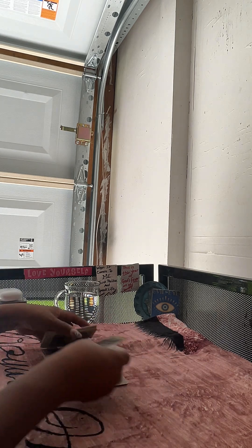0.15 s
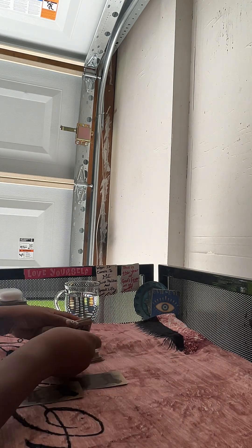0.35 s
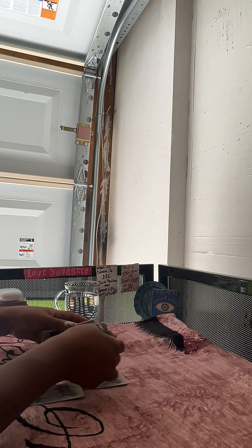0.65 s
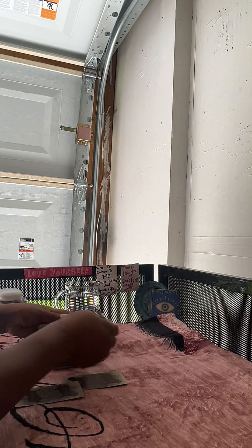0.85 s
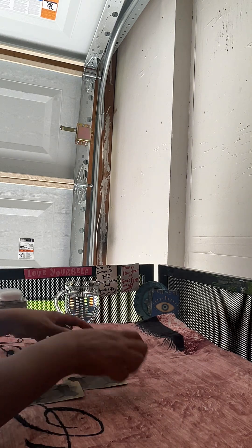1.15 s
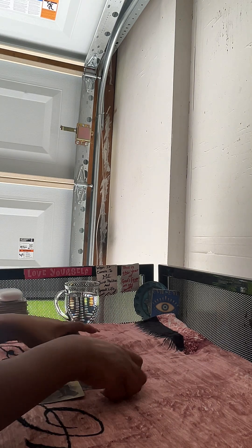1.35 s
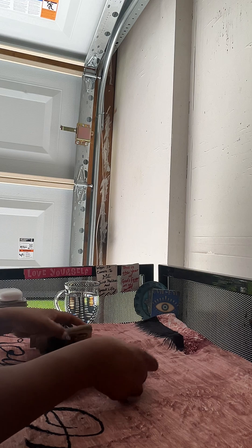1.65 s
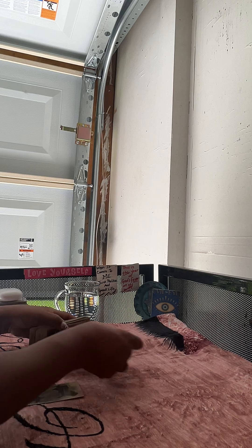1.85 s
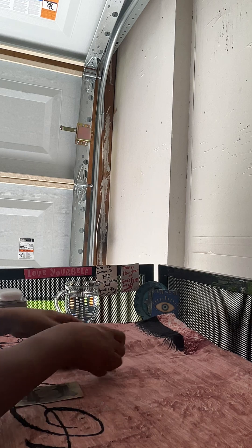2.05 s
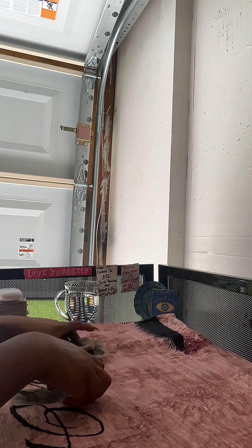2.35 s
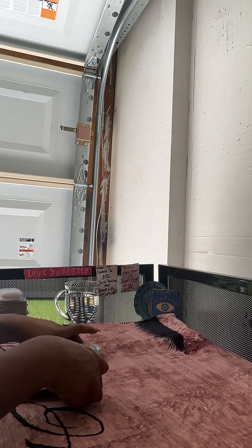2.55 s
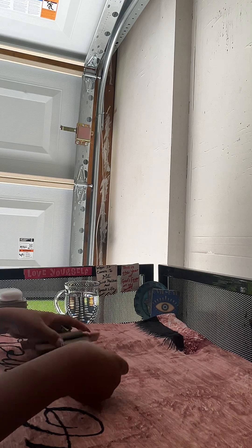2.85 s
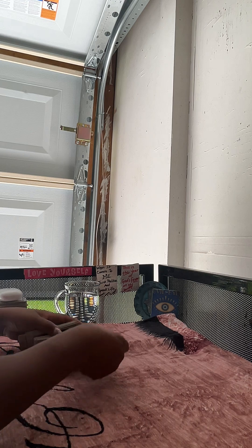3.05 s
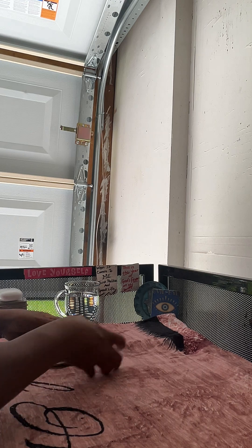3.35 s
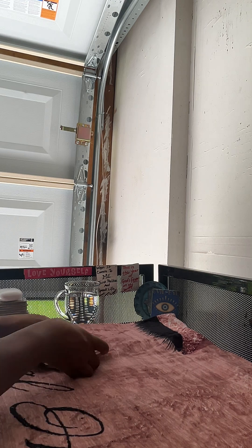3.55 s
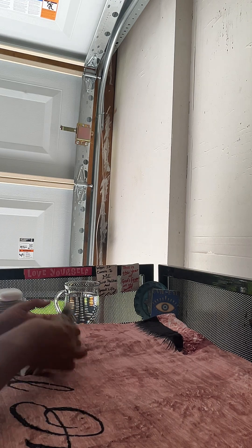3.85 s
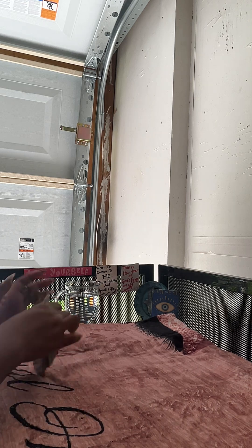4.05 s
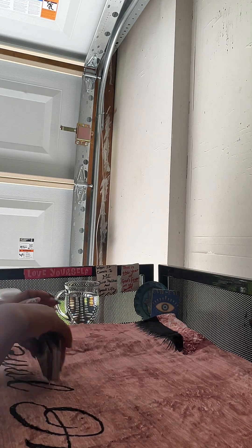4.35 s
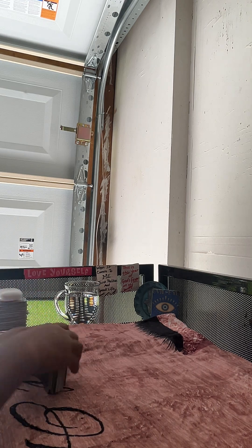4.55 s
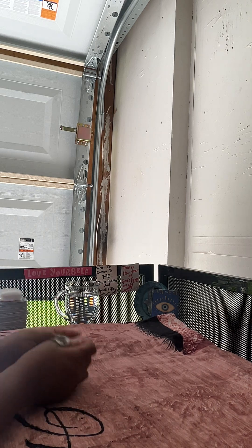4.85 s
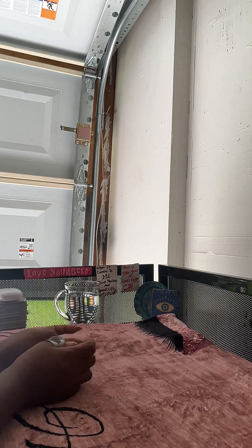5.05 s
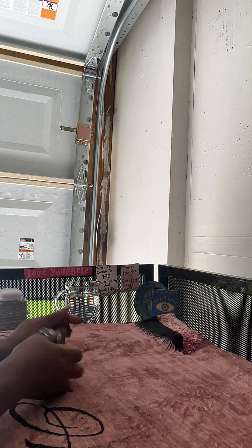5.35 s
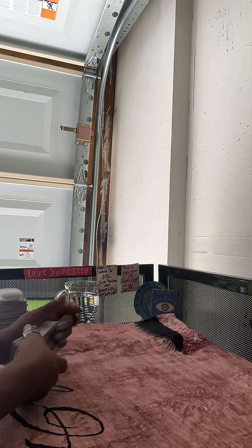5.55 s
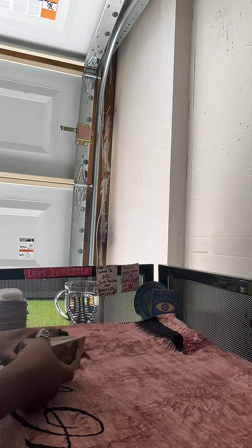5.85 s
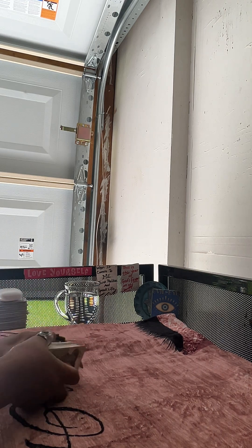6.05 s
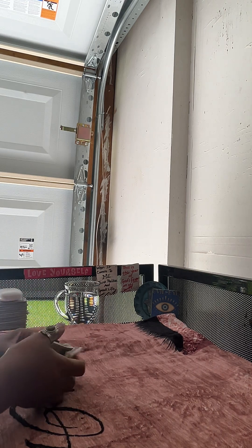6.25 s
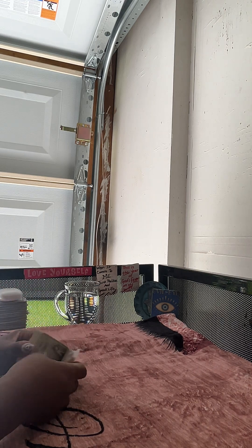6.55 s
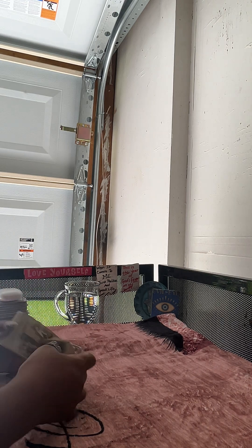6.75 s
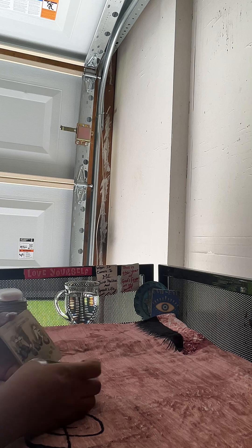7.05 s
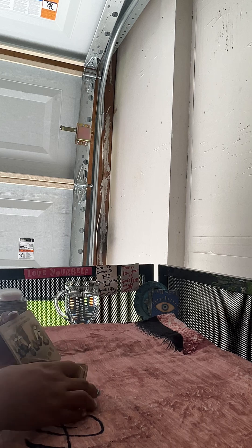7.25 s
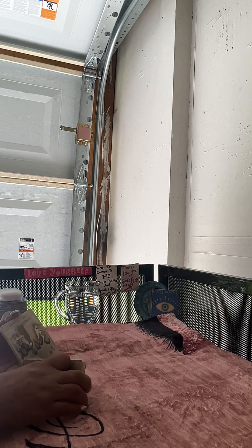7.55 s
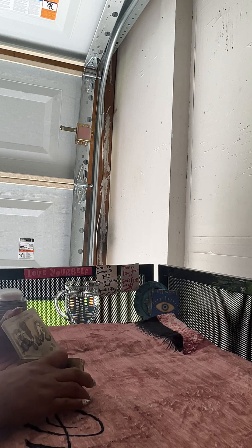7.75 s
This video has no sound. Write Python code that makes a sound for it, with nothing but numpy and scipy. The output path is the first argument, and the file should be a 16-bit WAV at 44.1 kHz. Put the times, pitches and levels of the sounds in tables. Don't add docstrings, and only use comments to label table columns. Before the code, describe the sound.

A worn deck is handled on a padded tabletop. Sparse snaps and swishing slides come first over a faint receding tyre hiss, then a busier flurry of slaps and scrapes, and dull wooden bumps as the pile is squared. A lull leads to a short, much louder purring riffle, followed by small rubs and a last soft slap. Near, dry sound in a small garage.

```python
import sys
import numpy as np
from scipy import signal
from scipy.fft import rfft, irfft, next_fast_len
from scipy.io import wavfile

SR = 44100
rng = np.random.default_rng(int(sys.argv[2]) if len(sys.argv) > 2 else 0)


def put_to_file(sound):
    columns = np.atleast_2d(sound).T
    safe = np.clip(columns, -1, 1)
    whole_steps = np.round(safe * 32767)
    wavfile.write(sys.argv[1], SR, whole_steps.astype(np.int16))


def ratio(d):
    e = np.asarray(d, float) / 20
    return 10 ** e


N = 348886
SIZE = next_fast_len(N + SR)
HZ = np.maximum(np.fft.rfftfreq(SIZE, 1 / SR), 1)

# start in seconds, peak in dB, pitch in
# Hz.
CARD_SLAPS = [(0.008, -51, 1210), (0.371, -59, 437), (0.721, -56, 400), (0.735, -61, 300),
              (0.977, -45, 1180), (0.991, -44, 690), (1.155, -58, 600), (1.184, -50.5, 580),
              (0.998, -43.5, 1170), (1.008, -42, 1110), (1.2805, -35, 1760), (1.283, -46, 322),
              (1.29, -57, 282), (1.582, -47, 1200), (1.597, -43.5, 1250), (2.027, -71, 437),
              (2.119, -48.5, 700), (2.146, -41.5, 490), (2.507, -44, 345), (2.507, -40, 2880),
              (2.513, -39.5, 593), (2.518, -52, 433), (2.635, -56.5, 440), (2.88, -58.5, 1610),
              (3.09, -61.5, 1500), (3.239, -43, 1600), (3.284, -49.5, 420), (3.374, -45, 1160),
              (3.418, -32.5, 890), (3.439, -33.5, 444), (3.4445, -36, 555), (3.454, -43, 445),
              (3.478, -37, 1540), (3.489, -32, 1850), (3.664, -42, 1330), (3.824, -34.5, 1380),
              (3.8245, -36.5, 965), (3.907, -34.5, 1990), (3.95, -48.5, 565), (4.101, -72, 530),
              (4.14, -48.5, 426), (4.152, -52.5, 294), (4.454, -57.5, 764), (4.492, -56, 696),
              (4.532, -55, 420), (4.629, -68, 657), (4.784, -51, 790), (4.88, -45.5, 1220),
              (4.99, -52.5, 1160), (5.097, -56.5, 485), (5.231, -56.5, 1060), (5.271, -66, 1250),
              (5.29, -46, 1120), (5.305, -47.5, 1040), (5.32, -48.5, 910), (5.378, -55.5, 527),
              (5.449, -64, 750), (5.482, -52, 1090), (5.583, -60, 635), (5.742, -65, 1190),
              (5.765, -54.5, 352),
              (6.789, -62, 480), (6.861, -54, 664), (6.922, -67, 607), (6.948, -54, 1300),
                 (6.995, -57, 597), (7.2465, -40.5, 1544)]
# start in seconds, peak in dB, pitch in Hz.
PACKET_SLAPS = [(6.1875, -27.5, 2700.0), (6.226, -33.5, 520.0), (6.2625, -29, 400.0), (6.2348, -32, 830.0),
                (6.2498, -22, 730.0), (6.2584, -23.5, 690.0), (6.2857, -8.5, 1000.0), (6.3037, -8, 980.0),
                (6.3105, -25.5, 1160.0), (6.3255, -9.5, 1100.0), (6.335, -31, 1070.0), (6.3463, -18, 800.0),
                (6.354, -31.5, 970.0), (6.3601, -20, 800.0), (6.3688, -19.5, 820.0), (6.3818, -19.5, 750.0),
                (6.4004, -19.5, 750.0), (6.4051, -17, 750.0), (6.4246, -19.5, 820.0), (6.4395, -18, 800.0),
                (6.4527, -19, 800.0)]


def slaps(rows, gain_db, puff_share, puff_t60_s, ring_cycles, pile_share, crack_share, flap_share,
          cloth_share, settled, sharp_s):
    crack_s, flap_ratio, flap_t60_s = .0001, 2.4, 0.012
    cloth_hz, cloth_sag_per_s, cloth_rise_s, cloth_t60_s = 487, 9.0, 0.0044, 0.031
    puff_likeness = 0.27
    out, t = np.zeros((2, N)), np.arange(4000) / SR
    puffs = band(rng.standard_normal((len(rows), 2, len(t))), 310, 2700)
    change = (puff_likeness - 1) * puffs[:, 0] + np.sqrt(1 - puff_likeness ** 2) * puffs[:, 1]
    puffs[:, 1] = puffs[:, 0] + band(change, 500, 2300, order=3)
    rise = (1 - np.exp(-t / 0.00053)) ** 2
    cloth = np.sin(2 * np.pi * cloth_hz * t * (1 - cloth_sag_per_s * t))
    cloth = cloth * (1 - np.exp(-t / cloth_rise_s)) * ratio(-60 * t / cloth_t60_s)
    for (s, peak_db, hz), puff in zip(rows, puffs):
        cycles = hz * (settled * t + sharp_s * (1 - np.exp(-t / .001)))
        pocket = np.sin(2 * np.pi * cycles) * ratio(-60 * t * hz / ring_cycles)
        pile = np.sin(np.pi * cycles) * ratio(-60 * t * hz / 10.0)
        flap = np.sin(2 * np.pi * flap_ratio * cycles) * ratio(-60 * t / flap_t60_s)
        crack = np.exp(-((cycles - .75) / (hz * crack_s)) ** 2)
        pop = pocket + pile_share * pile + flap_share * flap + cloth_share * cloth - crack_share * crack
        add(out, s, ratio(peak_db + gain_db) * rise * (pop + puff_share * puff * ratio(-60 * t / puff_t60_s)))
    return out


# start in seconds, peak in dB, dullness in dB.
EDGE_TICKS = [(0.006, -50, -23), (0.3696, -43, -2), (0.404, -42, -3), (0.524, -62, 4), (0.583, -60.5, 14),
              (0.9747, -48, -17), (0.9904, -34, -32), (0.997, -47, 9.5), (1.007, -54, -7),
              (1.1575, -50.5, -9), (1.2012, -38.5, -5), (1.281, -37.5, 3), (1.5066, -37.5, -12),
              (1.5983, -49, 18), (2.1199, -45, -2), (2.1429, -40.5, -8), (2.241, -57, 4),
              (2.2627, -43.5, -11), (2.45, -50, -7), (2.507, -45, 7.5), (2.695, -45, -17),
              (3.226, -57, -1), (3.241, -47.5, -8), (3.284, -44.5, -32), (3.3925, -43.5, 4),
                  (3.398, -56, 10), (3.4804, -51, -1), (3.6566, -43, 1), (3.8248, -37, 1),
                  (3.904, -43, -17), (4.1793, -46, -9), (4.4525, -60, -3), (4.4901, -55, -14),
                  (4.531, -55, -11), (4.6373, -67, -8), (4.7595, -61, 2), (5.198, -66, -10),
                  (5.5452, -69, -7), (3.3756, -59, -5), (4.7837, -54, -1), (4.8798, -61, 19),
                  (4.9207, -41, -18), (4.9928, -54.5, 4), (5.16, -55.5, -15), (5.377, -38, -23),
                  (5.452, -41, -13), (5.5825, -50, -18), (5.74, -53, -17), (6.117, -66, -14),
                  (6.126, -52, -2), (6.177, -62, -9),
              (6.576, -45, -14), (6.791, -49, 1), (6.811, -57, 12), (6.8623, -45, 2.5),
                 (6.993, -58, 9.5), (6.706, -48, -15), (7.2468, -53.5, 2.5)]
# start in seconds, peak in dB, dullness in dB.
CORNER_TICKS = [(6.1888, -25.5, 3.5), (6.2058, -41.5, 3.5), (6.2103, -40, -2), (6.2204, -32.5, -5),
                (6.2367, -39.5, -2.5), (6.2438, -36, -5), (6.2503, -25, -5), (6.2589, -23, -4),
                (6.2744, -36, -5), (6.286, -28, 4), (6.2927, -33.5, -2.5), (6.3045, -27.5, 2.5),
                (6.3122, -35.5, 2.5), (6.3155, -31.5, -6.5), (6.3263, -25, -1.5), (6.3346, -32.5, -4),
                (6.3483, -32, 0), (6.3573, -37, 2), (6.3604, -38.5, -1), (6.3702, -28.5, -6),
                (6.3818, -43, 11), (6.3893, -28.5, -1), (6.3942, -29, -7), (6.4004, -37, 7),
                (6.4051, -37, 12), (6.4139, -36.5, -4), (6.4245, -36.5, 3.5), (6.4287, -26, -6),
                (6.4417, -24.5, -10), (6.4528, -37, 4.5)]


def ticks(rows, dull_gain_db, corner_share):
    gain_db, edge_dullness = 6.0, 0.35
    out, t = np.zeros(N), np.arange(2000) / SR
    rattle_and_fizz = ratio(-60 * t / .004) + .2 * ratio(-60 * t / .025)
    force = rng.standard_normal((len(rows), len(t))) * rattle_and_fizz
    force[:, 0] = -3
    brights = signal.lfilter([.6], [1, -edge_dullness], band(force, 4000, 17000))
    brights = brights + corner_share * band(force, 4400, 7600)
    for (s, peak_db, dull_db), dull, bright in zip(rows, band(force, 2500, 4800), brights):
        add(out, s, ratio(peak_db + gain_db) * (ratio(dull_db + dull_gain_db) * dull + bright))
    return out


# frequency in Hz, density in dB per Hz.
BRUSH_COLOUR = [(70, -17.5), (140, 6), (250, 9.5), (450, 10), (700, -7), (1000, -4.5), (1600, -47)]
# frequency in Hz, density in dB per Hz.
EDGE_COLOUR = [(3500, -25), (5000, -2), (7000, 0), (9000, -3), (12000, -5), (14000, -9), (16000, -12)]
# frequency in Hz, density in dB per Hz.
DULL_EDGE_COLOUR = [(1800, -54.5), (2800, -10.5), (4000, 3.5), (5500, -7), (7500, -32)]
# time in seconds, level in dB.
PALM_LEVEL = [(0.0, -69), (0.99, -70), (1.45, -60), (1.74, -67.5), (1.96, -77), (2.49, -67.5),
              (2.82, -76.5), (3.26, -70.5), (3.52, -51), (4.16, -69.5), (4.29, -71.5), (5.44, -68),
              (5.79, -79.5), (6.06, -74.5), (6.34, -47), (6.54, -66.5), (7.51, -86.5), (7.91, -83.5)]
# frequency in Hz, density in dB per Hz.
PALM_SPECTRUM = [(150, -5), (350, -10), (800, -8.5), (1400, -5.5), (2500, -6.5), (4000, -11), (6000, -39.5)]
# time in seconds, level in dB.
FLUTTER_LEVEL = [(6.18, -120), (6.186, -75), (6.192, -44.5), (6.23, -47), (6.255, -37.5), (6.28, -47),
                 (6.31, -50), (6.455, -42.5), (6.48, -52.5), (6.58, -74.5), (6.7, -110)]
# frequency in Hz, density in dB per Hz.
FLUTTER_SPECTRUM = [(150, -20.5), (280, 5), (450, 5), (1100, 0.5), (2000, -4), (4000, -7.5), (6000, -30.5)]


def slides():
    catches_per_s, catch_db = 120, 16
    brush_db, scrape_db, edge_db = strokes()
    dull_db = edge_db + 0.26 * (scrape_db - edge_db) - 1
    slips = rng.standard_normal((2, N)) * ratio(2.9 * np.minimum(rng.exponential(1, (2, N)), 5))
    catches = rng.random(N) < catches_per_s / SR
    slips = slips + catches * ratio(catch_db + 4.0 * np.minimum(rng.exponential(1, N), 2))
    pressure = ratio(1.5 * (drift(15) + drift(60)))
    brush = ratio(brush_db - 9.5 + 1.1 * drift(41)) * colour(slips, BRUSH_COLOUR)
    scrape = ratio(scrape_db - 6.5) * card_modes(slips)
    edges = ratio(edge_db - 6.0) * tilted(colour(slips, EDGE_COLOUR))
    dull_edges = ratio(dull_db - 6.5) * colour(slips, DULL_EDGE_COLOUR)
    palms = ratio(level_in_time(PALM_LEVEL) - 4.5 + 2.0 * drift(18.0)) * colour(slips, PALM_SPECTRUM)
    flutter = ratio(level_in_time(FLUTTER_LEVEL)) * colour(slips, FLUTTER_SPECTRUM)
    return pressure * (palms + brush + scrape + edges + dull_edges + flutter)


# start in seconds, fade in seconds, cloth brush, card scrape, edge hiss in dB.
FLICK_STROKES = [(0.0, 0.061, -62, -58, -59), (0.368, 0.27, -53, -54.5, -56.5),
                 (0.582, 0.09, -61, -59, -57.5), (0.722, 0.041, -46.5, -94, -99),
                 (0.99, 0.18, -49, -53, -46.5), (1.2, 0.13, -50.5, -79, -57),
                 (1.597, 0.17, -55.5, -61, -58), (2.023, 0.088, -48.5, -58.5, -69.5),
                 (2.137, 0.26, -46, -84, -64), (2.506, 0.25, -46, -52, -64),
                 (3.238, 0.21, -52.5, -59, -60.5), (3.39, 0.18, -58, -76, -57.5),
                 (3.41, 0.17, -43, -65, -70), (3.478, 0.36, -39, -47, -46),
                 (3.821, 0.29, -47.5, -48, -55.5), (4.458, 1, -58, -62, -85),
                 (5.582, 0.081, -63, -60, -53.5), (6.79, 0.13, -53, -59, -56),
                 (7.246, 0.44, -71, -64.5, -77.5)]
# start in seconds, length in seconds, cloth brush, card scrape, edge hiss in dB.
PUSH_STROKES = [(0.045, 0.13, -69.5, -68, -108), (1.274, 0.12, -52, -69.5, -64),
                (1.397, .14, -55.5, -69, -68.5), (2.235, 0.12, -57, -69, -66),
                (4.444, 0.12, -90, -90, -71.5), (2.389, 0.099, -56.5, -66, -69.5),
                (2.604, 0.098, -61, -90, -73.5), (3.657, 0.047, -80, -75, -66), (5.62, .1, -92, -77, -87),
                (3.894, 0.066, -50, -52.5, -61), (4.089, .21, -52.5, -60, -62),
                (4.62, 0.068, -79, -64, -66.5), (4.74, 0.29, -105, -66, -65.5),
                (5.08, 0.37, -65, -71.5, -77), (5.147, .05, -87, -84, -75),
                (5.256, 0.073, -65, -58.5, -63.5), (5.356, 0.17, -67, -61, -67.5),
                (5.54, .05, -74, -65, -65), (5.724, 0.073, -55.5, -61, -70.5),
                (5.995, 0.16, -70, -63.5, -65), (6.18, 0.3, -62, -74.5, -50), (6.464, 0.2, -66, -61, -66.5),
                (6.65, 0.076, -75, -70, -50), (6.779, 0.23, -62.5, -61.5, -67),
                (7.045, 0.18, -75.5, -72.5, -84), (7.17, 0.061, -86, -68, -74.5),
                (7.301, 0.8, -74.5, -95, -88)]


def strokes():
    flick_attack_s, flick_fade_db, edge_fades_faster = 0.0032, 28.5, 1.63
    push_attack_s, push_release_db_per_s, faces_release_stretch, push_swell_db = 0.012, 445, 0.69, 2
    resting_db = np.c_[[-75.5, -88.5, -99]]
    t = np.arange(SR) / SR
    power = ratio(2 * (resting_db + np.pad(background_change_db(), (0, SR))))
    for s, fade_s, *levels_db in FLICK_STROKES:
        fall_db = flick_fade_db * t / fade_s * np.c_[[1, 1, edge_fades_faster]]
        at = round(s * SR)
        power[:, at:at + SR] += (np.minimum(t / flick_attack_s, 1) * ratio(np.c_[levels_db] - fall_db)) ** 2
    for s, length_s, *levels_db in PUSH_STROKES:
        release_s = np.maximum(t - length_s, 0) / np.c_[[faces_release_stretch, faces_release_stretch, 1]]
        fall_db = push_release_db_per_s * release_s + push_swell_db * np.minimum(2 * t / length_s - 1, 1) ** 2
        at = round(s * SR)
        power[:, at:at + SR] += (np.minimum(t / push_attack_s, 1) * ratio(np.c_[levels_db] - fall_db)) ** 2
    return 10 * np.log10(power[:, :N])


# frequency in Hz, width in Hz, level in dB.
CARD_MODES = [(720, 400, -1), (950, 400, -1), (1200, 450, 0), (1500, 500, -2), (1850, 550, -4),
              (2250, 600, -4), (2750, 700, -5)]


def card_modes(slips):
    modes = (ratio(db + 2.5 * drift(10)) * resonance(slips, hz, width_hz) for hz, width_hz, db in CARD_MODES)
    return rms_one(sum(modes))


def tilted(hiss):
    split_hz, tilt_db = 6600, 2.5
    low = signal.sosfilt(signal.butter(2, split_hz, fs=SR, output="sos"), hiss)
    high = signal.sosfilt(signal.butter(2, split_hz, "high", fs=SR, output="sos"), hiss)
    return ratio(tilt_db * drift(11)) * low - ratio(tilt_db * drift(9)) * high


# start in seconds, length in seconds, level in dB, low and high edge in Hz.
BAND_NOISES = [(0.3, 0.5, -86, 4900, 5200), (2.505, 0.07, -57, 1850, 2700), (2.535, 0.15, -67, 5850, 7900),
               (2.3, .04, -60, 4800, 15800), (6.19, .26, -56, 12500, 16400),
               (3.391, .016, -54, 4000, 5600), (3.482, .07, -60, 6100, 7500), (4.098, .06, -56, 340, 480),
               (0, 2.0, -82, 4300, 5300), (2.435, .07, -65, 900, 2600), (3.49, 0.07, -53, 1900, 2250),
               (3.54, 0.14, -54, 2050, 2500), (3.49, .14, -54, 950, 1250), (4.485, 0.04, -63, 4600, 6800),
               (4.53, .03, -64, 4600, 6800), (2.66, .12, -70, 1150, 1600), (6.01, .1, -66, 1050, 1400),
               (6.695, .04, -60, 4600, 8500), (7.16, .08, -74, 1500, 2300), (5.728, 0.12, -73, 5600, 6800),
               (5.74, 0.21, -71, 6700, 7800), (5.8, .16, -84, 3900, 5600), (7.35, 0.39, -88, 4000, 4600)]


def draws():
    out, t = np.zeros(N), np.arange(100000) / SR
    grip = drift(28)
    for s, length_s, level_db, low_hz, high_hz in BAND_NOISES:
        start = np.clip(t / min(.015, length_s / 6), 0, 1)
        end = np.clip((length_s - t) / min(.12, length_s) + .5, 0, 1)
        wavering = ratio(2 * np.roll(grip, round(-s * SR))[:len(t)])
        rub = rms_one(band(rng.standard_normal(len(t)), low_hz, high_hz, order=4))
        add(out, s, ratio(level_db) * start * wavering * end * rub)
    return out


# crest in seconds, peak in dB, pitch in Hz.
TABLE_THUMPS = [(0.76, -52, 64.6), (2.179, -46.5, 61.5), (2.522, -59, 70), (3.509, -44, 60),
                (3.59, -54, 64.4), (4.125, -39.5, 74), (4.163, -30.5, 73), (4.15, -32, 168),
                (4.186, -43, 75), (4.21, -46, 76.5), (4.245, -47, 62), (4.48, -40.5, 78), (4.508, -41, 87),
                (4.551, -38.5, 67), (4.818, -49, 69), (4.875, -42, 61), (4.921, -50, 69),
                (5.043, -40, 56.5), (5.188, -53, 60), (6.326, -40, 71.6), (6.65, -52.5, 60),
                (6.89, -48.5, 59.7), (7.122, -55.5, 57)]


def thumps():
    leg_lag_s, deck_moves_left_s = .0009, 4.3
    lean_before_db, lean_after_db = -0.5, 2.5
    out, t = np.zeros((2, N)), np.arange(-2500, 2500) / SR
    for s, peak_db, hz in TABLE_THUMPS:
        lag_s = leg_lag_s if s < deck_moves_left_s else -leg_lag_s
        lean_db = lean_after_db if s > deck_moves_left_s else lean_before_db
        for side, late, db in zip(out, (t - lag_s, t + lag_s), (lean_db, -lean_db)):
            swell = np.exp(-(late * hz / 0.98) ** 2)
            add(side, s + t[0], ratio(peak_db + db) * swell * np.cos(2 * np.pi * hz * late))
    return out


# time in seconds, level in dB.
TREMBLE_LEVEL = [(0.0, -61), (0.26, -68.5), (1.5, -64), (1.91, -67), (2.34, -61.5), (3.0, -67), (3.28, -68),
                 (3.52, -54), (3.85, -65.5), (4.65, -62), (6.04, -71), (6.37, -60.5), (6.61, -70),
                 (7.36, -74), (7.51, -69.5), (7.91, -69)]
# frequency in Hz, density in dB per Hz.
RUMBLE_COLOUR = [(20, -28), (40, -1.5), (60, 8), (85, 1), (130, -7.5), (250, -45.5)]


def table():
    level_db = level_in_time(TREMBLE_LEVEL) + 3.5 + 2.0 * drift(4.9)
    return ratio(level_db) * colour(rng.standard_normal((2, N)), RUMBLE_COLOUR)


def garage(x):
    t60_s, wall_cut_hz = .3, 3500
    out, t60_s = np.zeros((2, len(HZ)), complex), t60_s / (1 + HZ / wall_cut_hz)
    for k, lag_s in enumerate(rng.uniform(0.008, 0.05, 14)):
        loop = np.exp(-lag_s * (np.log(1000) / t60_s + 2j * np.pi * HZ))
        out[k % 2] += loop / (1 - loop) * (-1) ** (k // 2)
    return irfft(out * rfft(x, SIZE), SIZE)[:, :N]


# frequency in Hz, density in dB per Hz.
AIR_COLOUR = [(100, 1.5), (340, -19), (1200, -11.5), (3000, -5.5), (3800, 0), (4700, -26), (6500, -30.5),
              (16000, -33)]


def outside():
    low_hz, high_hz, sag_hz, sinks_s = 8600, 9600, 400, 2.6
    t = np.arange(N) / SR
    roar_db, hiss_db, air_db = -71.5 - 3 * t, -76.5 - 2.5 * t, -77.5
    white = rng.standard_normal((3, 2, N))
    roar = resonance(white[0], 1400, width_hz=750) + .5 * rms_one(band(white[0], 2400, 5200))
    sunk = np.clip(t / sinks_s, 0, 1)
    near_hiss = band(white[1], low_hz, high_hz, order=3)
    far_hiss = band(white[1], low_hz - sag_hz, high_hz - sag_hz, order=3)
    hiss = rms_one((1 - sunk) * near_hiss + sunk * far_hiss)
    air = ratio(air_db) * colour(white[2], AIR_COLOUR)
    return ratio(roar_db + 0.56 * drift(4.6)) * roar + ratio(hiss_db + 0.7 * drift(3)) * hiss + air


# start in seconds, length in seconds, level in dB.
BACKGROUND_DIPS = [
    (2.74, .47, -6),
    (5.8, .2, -9),
]


def background_change_db():
    edge_s, t = .06, np.arange(N) / SR
    return sum(db * np.clip(np.minimum(t - s, s + length_s - t) / edge_s + .5, 0, 1)
               for s, length_s, db in BACKGROUND_DIPS)


# frequency in Hz, lead of the left port in radians.
LEFT_LEAD = [(0, 0), (400, 0), (780, 1.4), (1030, 4.2), (1400, 6.7), (2100, 12), (2300, 10.5), (3080, 9.7),
             (3580, 9.15), (4200, 8.6), (7700, 6.4), (9900, 6.0), (12300, 4.4), (13400, 3.4), (17000, 2.4)]
# frequency in Hz, left over right in dB for near sound.
LEFT_LEAN = [(60, 1), (380, -.5), (700, 7), (1900, 6), (2400, 8), (3100, 0), (16000, 0)]
# frequency in Hz, likeness of spread sound at the ports from 0 to 1.
LIKENESS = [(60, .85), (170, .5), (400, .85), (700, .3), (2200, .2), (3000, .999), (3700, .993),
            (4600, .96)]


def ports(direct, near, diffuse):
    sway_samples = .16
    alike, lean = np.clip(at_hz(LIKENESS), 0, 1), ratio(at_hz(LEFT_LEAN) / 2)
    unlike = np.sqrt(1 - alike ** 2)
    direct, near, diffuse = rfft(direct, SIZE), rfft(near, SIZE), rfft(diffuse, SIZE)
    near, diffuse = ([a, alike * a + unlike * b] for a, b in (near, diffuse))
    left = (direct[0] + near[0]) * lean + diffuse[0]
    right = (direct[1] + near[1]) / lean + diffuse[1]
    right = right * np.exp(-1j * np.interp(HZ, *np.transpose(LEFT_LEAD)))
    left, right = irfft([left, right], SIZE)[:, :N]
    return np.array([left, right + sway_samples * drift(3.2) * np.gradient(right)])


def rms_one(x):
    return x / np.sqrt(np.mean(x ** 2) + 1e-20)


def level_in_time(rows):
    return np.interp(np.arange(N) / SR, *np.transpose(rows))


def at_hz(points):
    hz, value = np.transpose(points)
    return np.interp(np.log(HZ), np.log(hz), value)


def colour(x, spectrum):
    return rms_one(irfft(rfft(x, SIZE) * ratio(at_hz(spectrum)), SIZE)[..., :N])


def drift(rate_hz):
    r = np.exp(-80 * np.pi * rate_hz / SR)
    slow = signal.lfilter([1], [1, -2 * r, r * r], rng.standard_normal(N // 40 + 2002))[2000:]
    return np.interp(np.arange(N) / 40, np.arange(len(slow)), rms_one(slow))


def resonance(x, hz, width_hz):
    r = np.exp(-np.pi * width_hz / SR)
    a = [1, -2 * r * np.cos(2 * np.pi * hz / SR), r * r]
    return rms_one(signal.lfilter([1, 0, -1], a, signal.lfilter([1, 0, -1], a, x)))


def band(x, low_hz, high_hz, order=2):
    return signal.sosfilt(signal.butter(order, [low_hz, high_hz], "band", fs=SR, output="sos"), x)


def add(out, s, sound):
    at = round(s * SR)
    out[..., at:at + sound.shape[-1]] += sound[..., :N - at]


def scene():
    dealt = slaps(CARD_SLAPS, gain_db=9.0, puff_share=0.29, puff_t60_s=0.079,
                  ring_cycles=9.0, pile_share=.35, crack_share=0.058, flap_share=0.11,
                  cloth_share=0.033, settled=0.817, sharp_s=0.00096)
    riffled = slaps(PACKET_SLAPS, gain_db=4.0, puff_share=0.22, puff_t60_s=.022,
                    ring_cycles=8.86, pile_share=.3, crack_share=.5, flap_share=0.22,
                    cloth_share=0.19, settled=.9, sharp_s=.0006)
    edges = ticks(EDGE_TICKS, dull_gain_db=4.5, corner_share=0.072)
    corners = ticks(CORNER_TICKS, dull_gain_db=4.0, corner_share=0.64)
    hits = dealt + riffled + edges + corners
    diffuse = ratio(-20) * garage(hits[0]) + table() + ratio(background_change_db()) * outside()
    return ports(hits + draws(), slides(), diffuse) + thumps()


def band_limit(x):
    return signal.sosfilt(signal.butter(12, 16490, fs=SR, output="sos"), x)


def record(dry):
    mix = signal.sosfilt(signal.cheby2(12, 70, 16900, fs=SR, output="sos"), dry)
    return band_limit(mix)


dry = scene()
out = record(dry)
put_to_file(out)
```